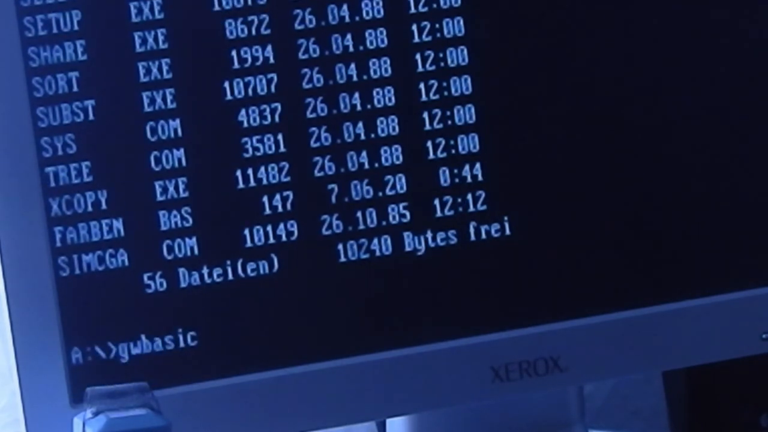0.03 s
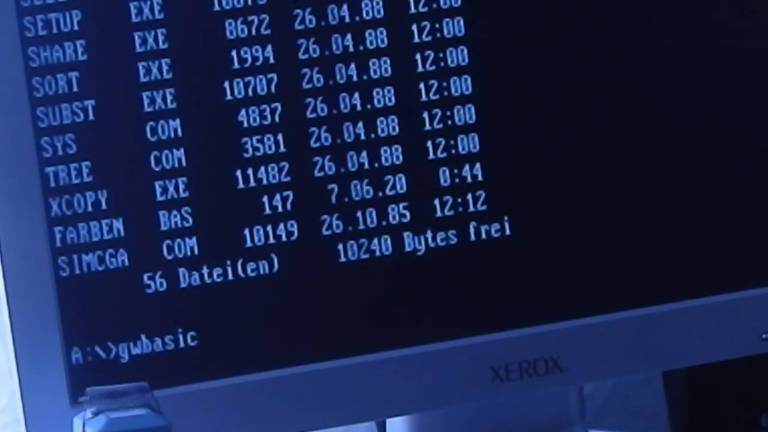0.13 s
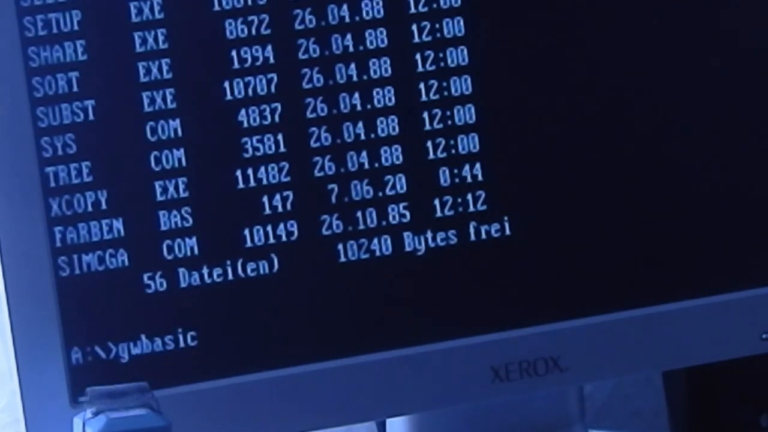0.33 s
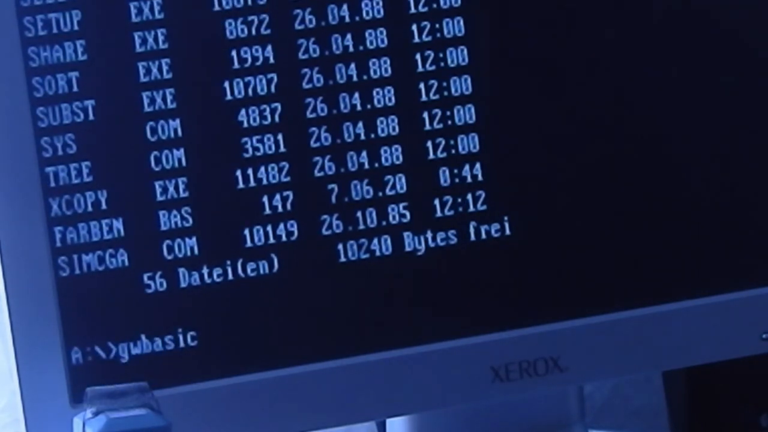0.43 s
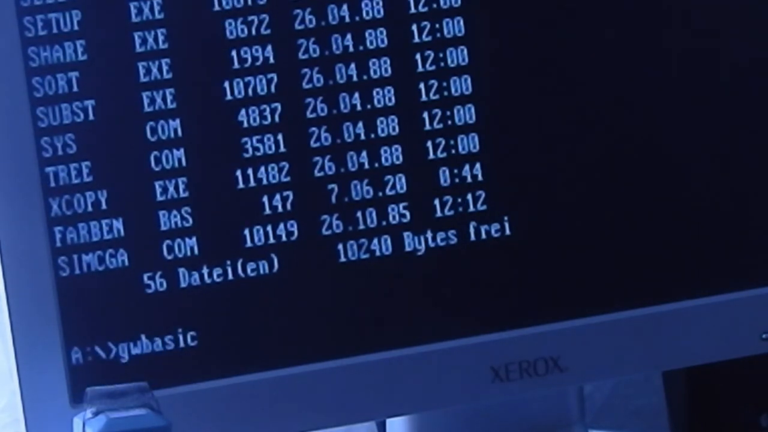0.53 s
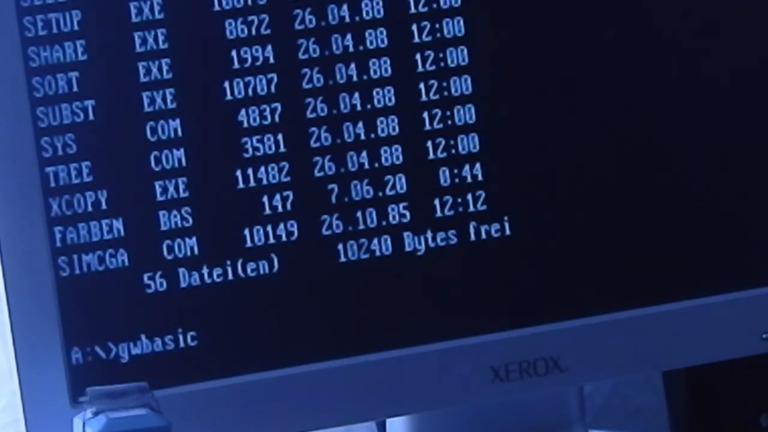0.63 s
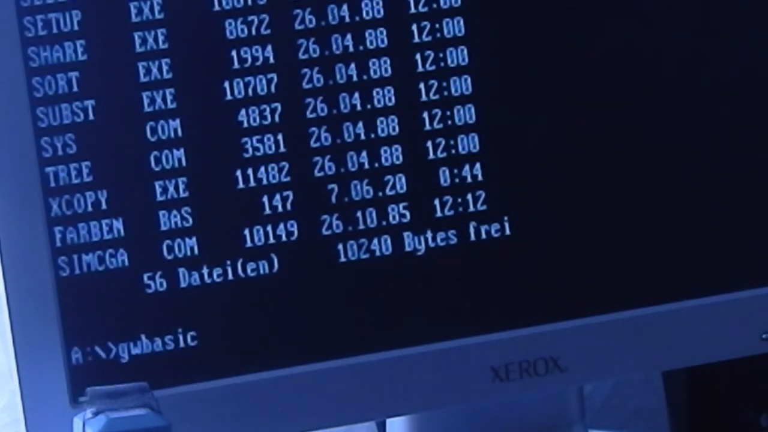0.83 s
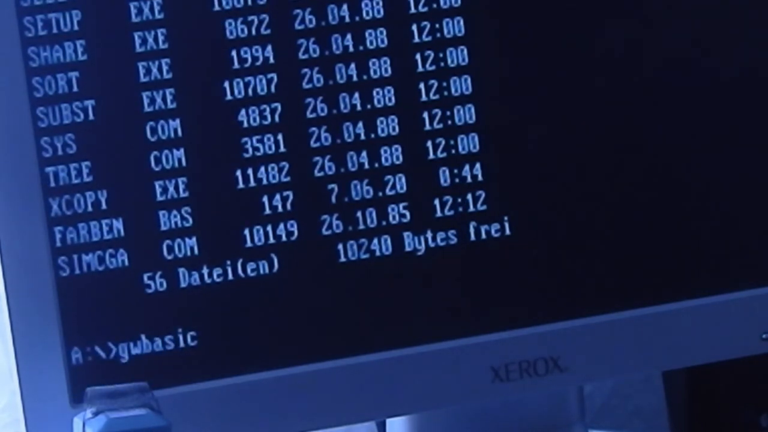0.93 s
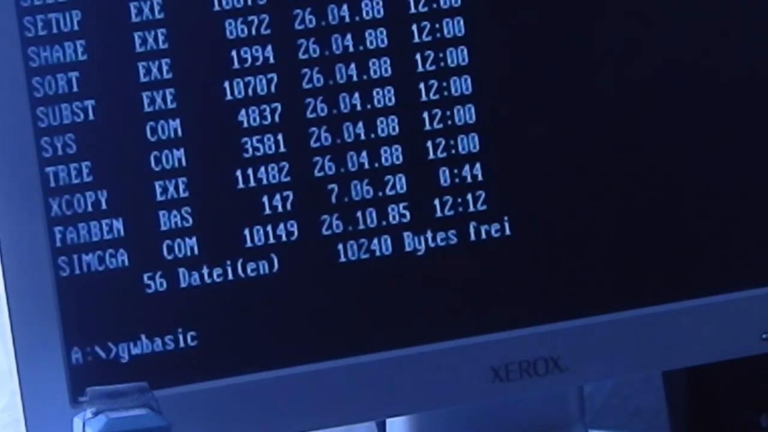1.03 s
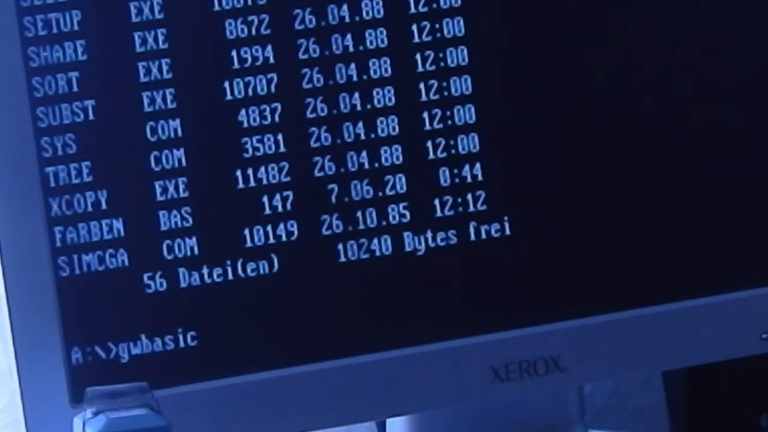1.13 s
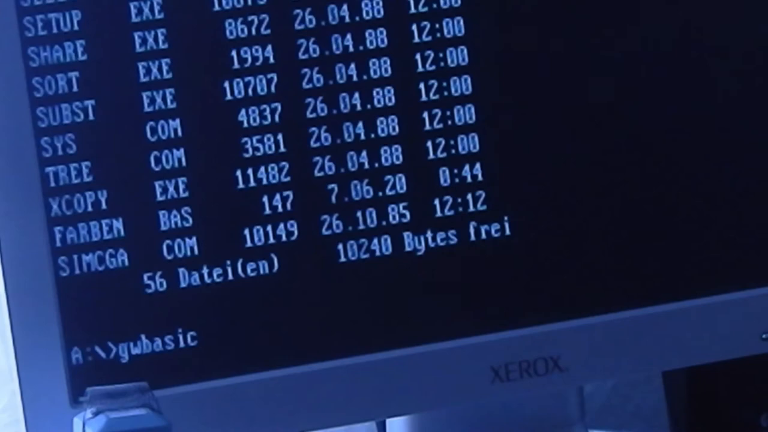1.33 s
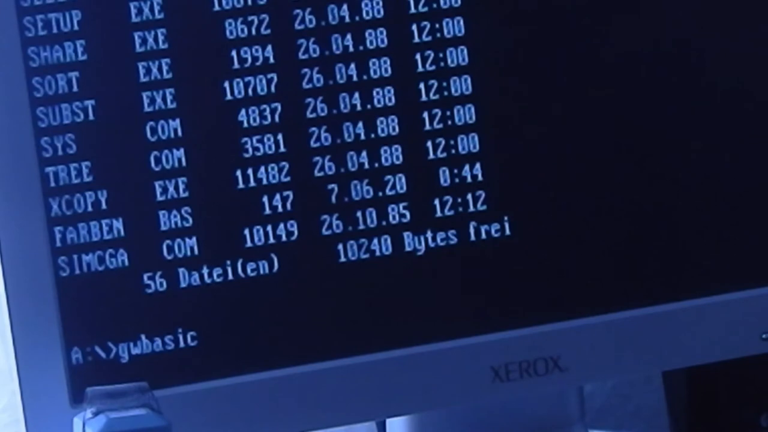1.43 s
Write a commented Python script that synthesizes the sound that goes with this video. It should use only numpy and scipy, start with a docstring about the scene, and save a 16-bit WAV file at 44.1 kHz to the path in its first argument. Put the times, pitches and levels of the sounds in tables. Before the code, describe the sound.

An old floppy drive buzzes briefly, then knocks a few times over a low fan hum.

```python
"""In a small room, an old computer's cooling fan hums and a floppy disk rubs softly in its sleeve.
A head step is just dying away as the sound opens. At 0.18 s the head runs across the disk in one short
buzz: the stepper's kicks rattle the carriage and ring the chassis. Single steps knock at 0.5 s and
0.9 s, the disk scuffing just before the second, and one more step begins at the very end."""
import sys
import numpy as np
from scipy import signal
from scipy.fft import rfft, irfft
from scipy.io import wavfile

SR = 44100
rng = np.random.default_rng(int(sys.argv[2]) if len(sys.argv) > 2 else 0)


def unload_wav(signal):
    """Save mono or channel-first audio to the path in sys.argv[1] as 16-bit WAV at rate SR, clipped to [-1, 1]."""
    wavfile.write(
        sys.argv[1],
        SR,
        np.round(np.clip(np.atleast_2d(signal).T, -1, 1) * 32767).astype(np.int16),
    )


N = 66150


def amp(db):
    """Decibels to gain."""
    return 10 ** (np.asarray(db) / 20)


def unit_rms(x):
    """Scales to rms 1."""
    return x / np.sqrt(np.mean(x ** 2) + 1e-20)


def curve_at(points, hz):
    """Reads a curve on a log-frequency axis."""
    freqs, values = np.transpose(points)
    return np.interp(np.log(hz + 1), np.log(freqs + 1), values)


def clock():
    """Time of every sample in seconds."""
    return np.arange(N) / SR


def drift(rate_hz):
    """Slow random motion of rms 1."""
    hz = np.fft.rfftfreq(N, 1 / SR)
    return unit_rms(irfft(rfft(rng.standard_normal(N)) / (1 + (hz / rate_hz) ** 2), N))


def envelope(start, rise, hold, fall):
    """Straight rise, exponential release; in seconds, with the hold counted from the start."""
    t = clock() - start
    return np.clip(t / rise, 0, 1) * np.exp(-np.maximum(t - hold, 0) / fall)


def partial(hz, wander=0):
    """A stereo sine of rms 1; higher ones tend to spread wider in phase."""
    spread = 0.45 * hz / 1000 * np.array([[1], [-1]]) * rng.uniform(-1.14, 1)
    return np.sqrt(2) * np.sin(2 * np.pi * (hz * clock() + rng.random()) + wander - spread)


def resonance(hz, width_hz):
    """A resonance kept ringing by random shaking."""
    tone = partial(hz, wander=1.54 * drift(width_hz))
    return tone * np.maximum(1 + 0.39 * drift(width_hz), 0)


# Stereo image of the noise. Each row: frequency in Hz, likeness of the channels from 0 to 1.
STEREO_LIKENESS = [(50, .55), (130, .88), (300, .8), (640, .95), (1400, .88), (2500, .72), (4200, .2),
                   (6000, .3), (7500, .85), (10000, .96), (15000, .98)]

def noise(colour):
    """Coloured stereo noise of rms 1, widest around 4-6 kHz."""
    hz = np.fft.rfftfreq(N, 1 / SR)
    likeness = curve_at(STEREO_LIKENESS, hz)
    mid, side = rfft(rng.standard_normal((2, N)))
    mid, side = mid * np.sqrt(1 + likeness), side * np.sqrt(1 - likeness)
    return unit_rms(irfft(np.array([mid + side, mid - side]) * amp(curve_at(colour, hz)), N))


# Fan and room air. Each row: frequency in Hz, relative noise density in dB.
AIR_COLOUR = [(25, -35), (50, -29), (80, -9), (150, 1.5), (195, 0.5), (235, -3.5), (300, -1), (420, -3.5),
              (640, 0), (780, -4.5), (1050, -4), (1220, -3), (1420, -1.5), (2000, -11), (3000, -14),
              (5000, -15.5), (15500, -38)]
# The fan's hum. Each row: pitch in Hz, level in dB.
FAN_TONES = [(199, -71), (605, -76.5), (678, -72.5), (861, -71.5), (1001, -68.5), (1044, -69), (1104, -72),
             (1405, -72.5)]

def fan():
    """The cooling fan lays down a bed of moving air and a few wavering tones."""
    air = amp(-61) * noise(AIR_COLOUR)
    return air + sum(amp(db) * resonance(hz, width_hz=9) for hz, db in FAN_TONES)


# Swells of the disk's rub. Each row: time in seconds, level in dB.
RUB_LEVEL = [(0, -66.5), (.17, -69.5), (.4, -67), (.48, -63), (.62, -60), (.76, -61.5), (.88, -62.5),
             (.97, -58.5), (1.08, -63), (1.13, -58), (1.22, -62.5), (1.33, -65.5), (1.41, -64.5),
             (1.5, -64)]
# Hiss of the rub. Each row: frequency in Hz, relative noise density in dB.
RUB_COLOUR = [(500, -5.5), (2500, -5.5), (4500, -6), (6200, 2.5), (7500, -3.5), (10500, 1), (13000, -1.5),
              (15500, -7)]
# Rasp of the scuff. Each row: frequency in Hz, relative noise density in dB.
SCUFF_COLOUR = [(500, -29), (2500, -7), (3500, 1.5), (5000, -1), (6400, 5), (8000, -27), (15000, -28)]

def disk(scuff_s=0.862, scuff_width_s=0.0097, scuff_db=-54):
    """The turning disk hisses against its sleeve and scuffs once."""
    t = clock()
    rub_db = np.interp(t, *np.transpose(RUB_LEVEL))
    rub = noise(RUB_COLOUR) * amp(rub_db + 0.67 * drift(80))
    scuff = noise(SCUFF_COLOUR) * amp(scuff_db) / (1 + ((t - scuff_s) / scuff_width_s) ** 2)
    return rub + scuff


# Chassis modes. Each row: pitch in Hz, nominal 60 dB decay in seconds, then relative level in dB
# in the long seek, in a bright step and in a heavy step.
CHASSIS_MODES = [(184.9, 0.071, -13, -6, -9.5), (296.4, 0.18, -34, -14, -17), (372, 0.17, -15, -19, -16),
                 (638.4, 0.1, 2, -6, -15), (672, 0.19, -2.5, -4, -5.5), (786.4, 0.14, -6, -7, -35),
                 (1009, 0.19, 2, -12, -14), (1084, 0.14, -3.5, -7, 0.5), (1166, 0.089, 3, -1.5, 3),
                 (1275, 0.082, 2, -2, -18), (1368, 0.051, 6.5, -12, -13), (1446, 0.097, -18, -20, -8),
                 (1548, 0.049, -23, -32, -2.5), (1643, 0.099, -17, -1, -18), (1720, 0.048, 1, 0, 2.5),
                 (1768, 0.079, 2.5, -13, -8), (1970, 0.055, -8, -8, -1), (2440, 0.051, -4, -1, -8),
                 (2650, 0.036, -11, -8, -9.5), (2970, 0.24, -8, -9.5, -13), (3450, 0.062, -29, -27, -12),
                 (4154, 0.063, -2, -3, -12), (4340, 0.045, -20, -30, -10)]

def chassis_ring(start, db, swell, hold, kind, damping=1.095):
    """The chassis swells and rings out after a step; low modes answer later."""
    ring = 0
    for hz, t60, _, *step_db in CHASSIS_MODES:
        lag = min(1000 / hz, 1.6) ** 0.67  # stretches the onset; 1 at 1 kHz
        rise = swell * lag
        shape = envelope(start + 0.0038 * lag, rise, rise + hold, fall=t60 / np.log(1000) / damping)
        ring = ring + amp(db + step_db[kind]) * partial(hz) * shape
    return ring


# A step's knock. Each row: frequency in Hz, relative noise density in dB when bright, and when heavy.
KNOCK_COLOUR = [(30, -45, -47), (69.6, -16, -18), (144, -14, -5), (500, -14.5, -14), (760, -12.5, -5.5),
                (1260, 2, -4.5), (1500, -13, -13.5), (1760, -2, -2), (1940, -4, -2.5), (2270, -12, -13),
                (2700, -1.5, -6), (3080, -8, -9), (3530, -19, -12.5), (4180, -10, -2), (4580, -30, -20),
                (5020, -10, -13.5), (6550, -18.5, -14), (8800, -16, -20.5), (15800, -21.5, -19.5)]
# The carriage's click. Each row: frequency in Hz, relative noise density in dB.
CLICK_COLOUR = [(300, -14), (3000, 3.5), (5200, -1.5), (7200, -17), (8800, -4.5), (12000, -1), (15500, -5)]
# Single steps. Each row: start in seconds, ring gain in dB, ring swell at 1 kHz and ring hold in
# seconds, knock gain in dB, knock hold in seconds, click gain in dB, click delay in seconds,
# kind (0 bright, 1 heavy).
HEAD_STEPS = [(-.028, -46, 0.0078, 0.0055, -40, .012, -40, 0.0058, 0),
              (0.497, -42, 0.0076, .003, -36, 0.0059, -37.5, 0.0075, 0),
              (0.896, -41, 0.01, 0.0069, -38, 0.012, -42, 0.0064, 1),
              (1.496, -69, .008, .002, -38.5, 0.011, -44, 0.00063, 1)]

def head_step(start, ring_db, swell, ring_hold, knock_db, knock_hold, click_db, click_delay, kind):
    """One move of the head, as (ringing, noise): the chassis, and a knock with the carriage's click."""
    knock_colour = np.array(KNOCK_COLOUR)[:, [0, 1 + kind]]
    knock = noise(knock_colour) * envelope(start, rise=0.0059, hold=knock_hold, fall=0.015)
    click = noise(CLICK_COLOUR) * envelope(start + click_delay, rise=0.0012, hold=0.0072, fall=0.0054)
    ring = chassis_ring(start, ring_db, swell, ring_hold, kind)
    return np.array([ring, amp(knock_db) * knock + amp(click_db) * click])


# Surges of the long seek. Each row: time in seconds, gain in dB.
SEEK_EFFORT = [(.182, -4.5), (.189, 2.5), (.198, -2), (.226, -2), (.236, 1), (.258, 2.5), (.276, -3),
               (.303, 2.5), (.322, -.5), (.344, 3), (.368, 1.5)]
# Rattle of the running carriage. Each row: frequency in Hz, relative noise density in dB.
RATTLE_COLOUR = [(30, -58), (80, -41), (170, -22), (450, -20), (700, -11.5), (880, -11.5), (1100, 0.5),
                 (1400, -7.5), (1850, -5), (2230, -8), (2570, -2), (3100, -10), (3700, -10), (4150, -8),
                 (4900, -18.5), (6700, -14.5), (7500, -22), (8600, -16.5), (9900, -19), (11000, -11),
                 (11900, -14.5), (12800, -21), (15500, -17.5)]
# The stepper's buzz. Each row: multiple of the step rate, relative level in dB.
STEPPER_HARMONICS = [(2, -6.5), (3, -14), (4, -13.5), (5, -9), (6, -16), (8, 0), (9, -17), (10, -26),
                     (11, -10), (12, -2), (14, -1.5), (19, -17), (20, -4), (21, -2.5)]

def long_seek(start=0.182, end=0.37, step_hz=122.9, kick_s=0.0024, rebound=0.35):
    """The stepper kicks and rebounds at every track, as (ringing, noise): buzz with chassis, and rattle."""
    t = clock()
    tracks = (t - start) * step_hz
    kick = np.exp(-(tracks % 1) / step_hz / kick_s)
    bounce = rebound * np.exp(-((tracks + 0.5) % 1) / step_hz / kick_s)
    pulses = 0.5 + kick + bounce  # a steady bed keeps the rattle going between kicks
    rattle = unit_rms(noise(RATTLE_COLOUR) * pulses * amp(drift(120)))
    rattle *= amp(-40) * envelope(start, rise=0.0011, hold=end - start, fall=0.0062)

    waver = 2 * np.pi * step_hz * 0.002 * np.cumsum(drift(29)) / SR  # pitch wavers by 0.2 %
    buzz = unit_rms(sum(amp(db) * partial(k * step_hz, k * waver) for k, db in STEPPER_HARMONICS))
    ring = unit_rms(sum(amp(db) * resonance(hz, 1.7 / t60) for hz, t60, db, _, _ in CHASSIS_MODES))
    body = amp(-45.5) * buzz + amp(-41.5) * ring
    body *= envelope(start, rise=0.0023, hold=end - start, fall=0.018)

    effort = amp(np.interp(t, *np.transpose(SEEK_EFFORT)))
    return effort * np.array([body, rattle])


# The drive's place in the image. Each row: frequency in Hz, phase lead of the right channel in radians.
RIGHT_LEAD = [(100, 0.11), (700, 0.34), (1500, 0.29), (2500, 0.47), (4200, 1.5), (6000, 0.88), (8000, 0.58),
              (15000, 0)]

def place_drive(x, low_cut_hz=91):
    """The drive comes through with little bass and stands a little to the right, arriving earlier there."""
    hz = np.fft.rfftfreq(2 * N, 1 / SR)
    low_cut = (1j * hz / (1j * hz + low_cut_hz)) ** 2
    ears = np.exp(0.5j * curve_at(RIGHT_LEAD, hz) * np.array([[-1], [1]]))
    return irfft(rfft(x, 2 * N) * low_cut * ears)[..., :N]


# Early reflections off the desk and the case. Each row: delay in seconds, gain against the direct sound.
REFLECTIONS = [(.0011, 0.36), (.0031, 0.39), (.0059, 0.54), (.0111, 0.23)]

def with_reflections(x):
    """Nearby surfaces add a few quick echoes, which make the rattle boxy."""
    hz = np.fft.rfftfreq(2 * N, 1 / SR)
    comb = 1 + sum(gain * np.exp(-2j * np.pi * hz * delay) for delay, gain in REFLECTIONS)
    return irfft(rfft(x, 2 * N) * comb / np.sqrt(np.mean(abs(comb) ** 2)))[:, :N]


# The small room's reverb. Each row: frequency in Hz, 60 dB decay in seconds.
ROOM_DECAY = [(150, 0.59), (1000, 0.31), (3000, 0.26), (8000, 0.3), (15000, 0.13)]

def room(x, predelay_s=0.0059):
    """A short diffuse tail whose treble dies first."""
    white = noise([(20, 0), (20000, 0)])
    hz, t, spectra = signal.stft(white, SR, nperseg=256)
    decay = amp(-60 * t / curve_at(ROOM_DECAY, hz)[:, None])
    tail = signal.istft(spectra * decay, SR, nperseg=256)[1][:, :N]
    tail *= np.clip(clock() / predelay_s - 1, 0, 1)
    return signal.fftconvolve(x, tail / np.linalg.norm(tail[0]), axes=1)[:, :N]


def scene():
    """The drive, its reflections and the room, over the disk's hiss and the fan."""
    drive = long_seek() + sum(head_step(*row) for row in HEAD_STEPS)
    ringing, rattling = place_drive(drive)
    room_send = (amp(-12) * ringing + amp(-7) * rattling).mean(0, keepdims=True)
    return ringing + with_reflections(rattling) + room(room_send) + disk() + fan()


def record(dry):
    """Final EQ: a narrow notch in the treble, then a steep high cut."""
    notch_hz, half_width_hz, high_cut_hz = 7870, 110, 15800
    hz = np.fft.rfftfreq(2 * N, 1 / SR)
    notch = 1 - np.exp(-((hz - notch_hz) / half_width_hz) ** 4)
    notched = irfft(rfft(dry, 2 * N) * notch)[:, :N]
    high_cut = signal.firwin(511, high_cut_hz, window=("kaiser", 9), fs=SR)
    return signal.oaconvolve(notched, high_cut[None], "same")


dry = scene()
out = record(dry)
unload_wav(out)
```